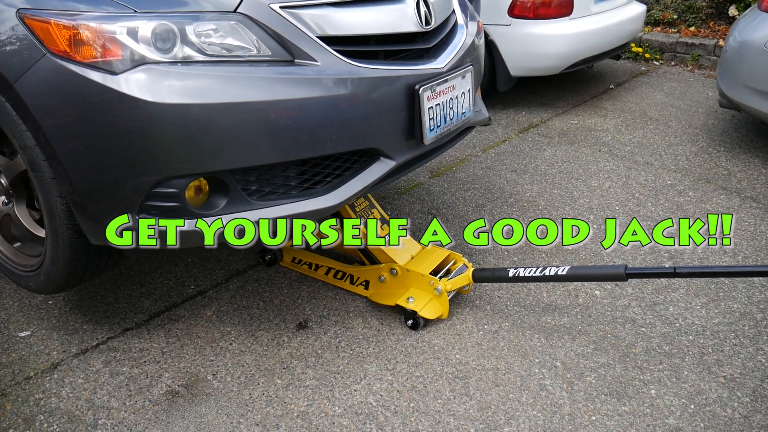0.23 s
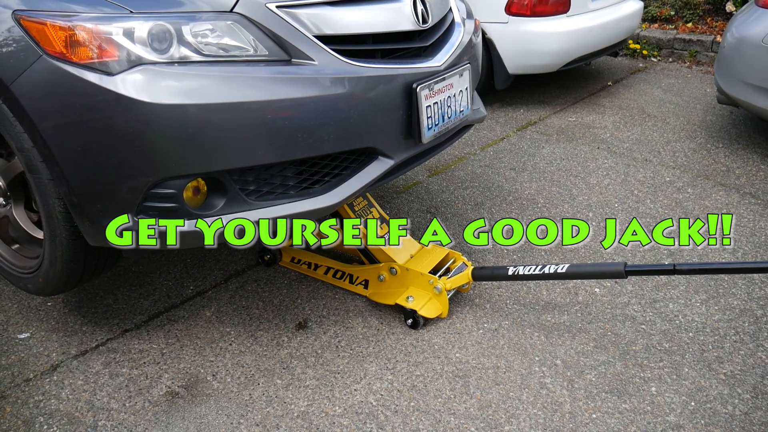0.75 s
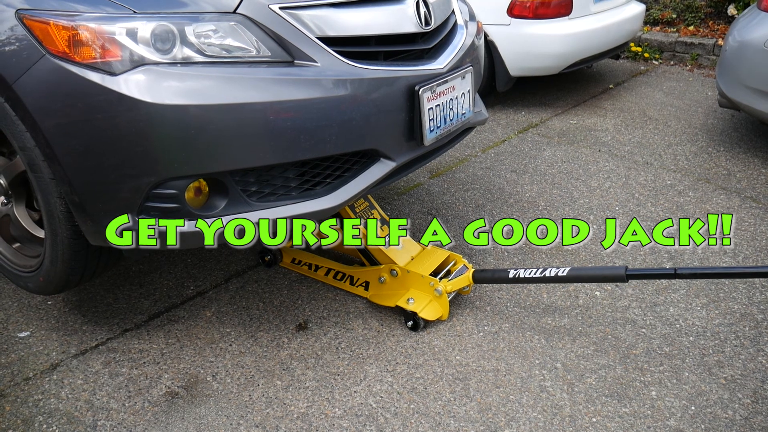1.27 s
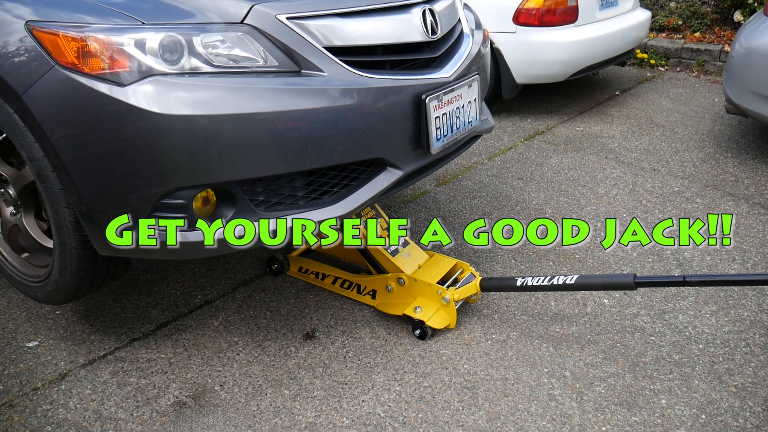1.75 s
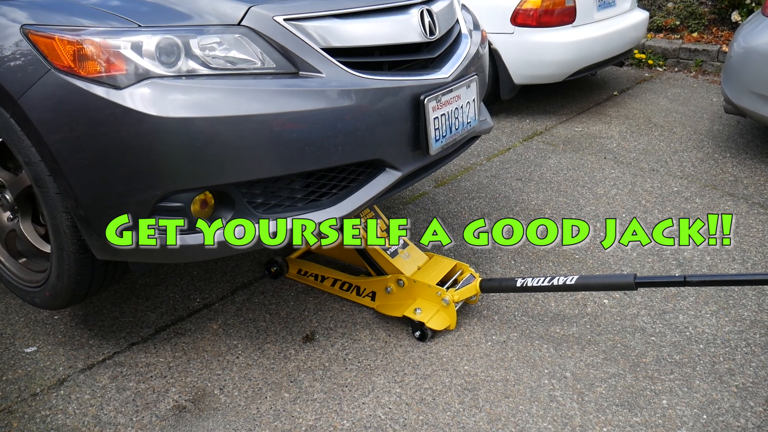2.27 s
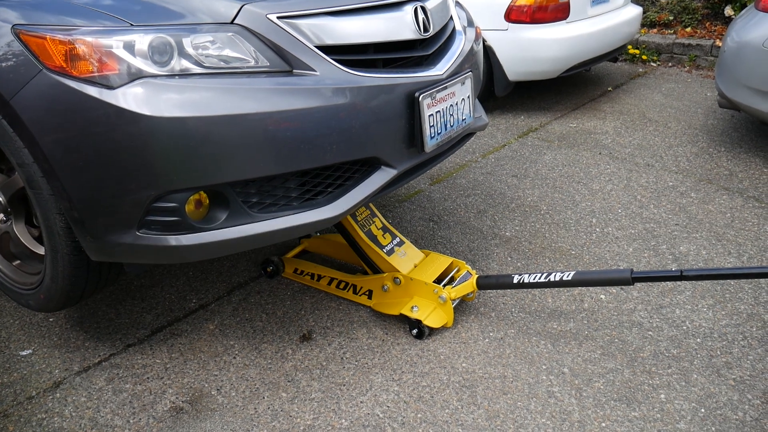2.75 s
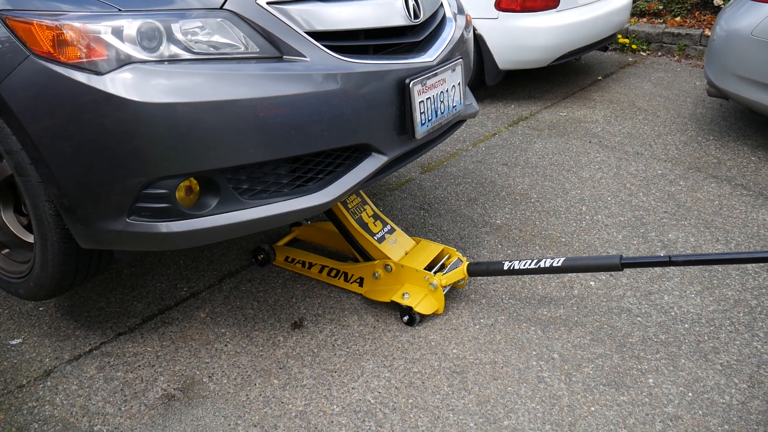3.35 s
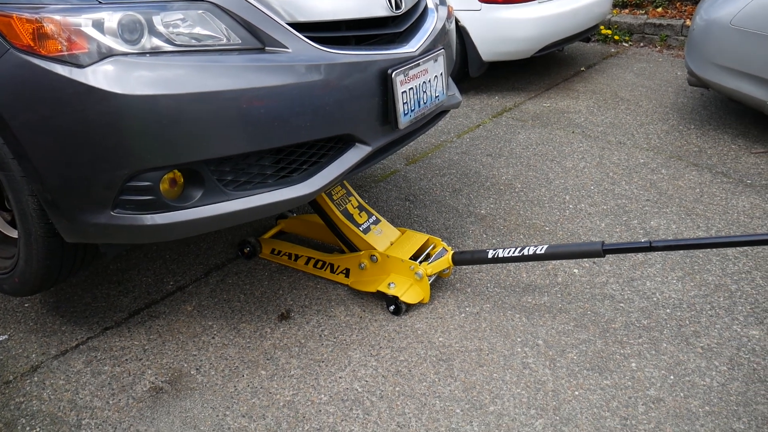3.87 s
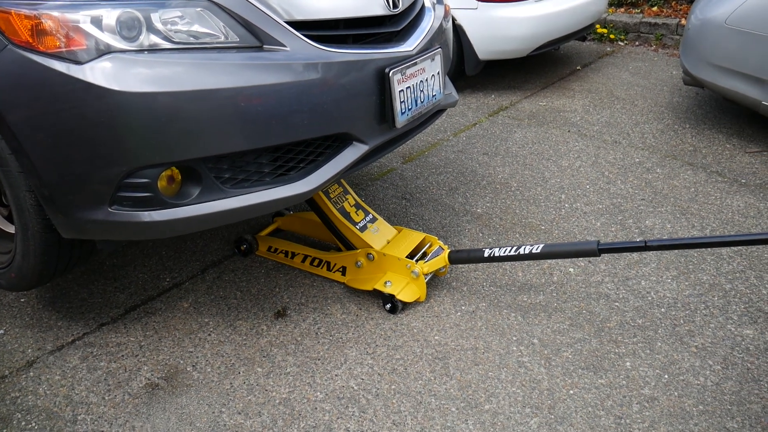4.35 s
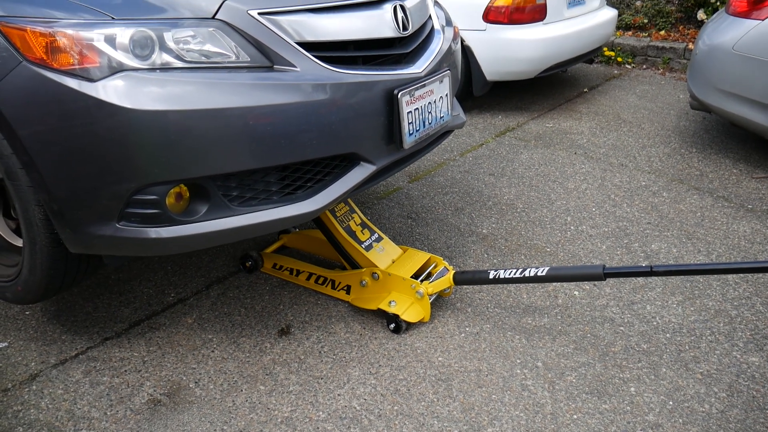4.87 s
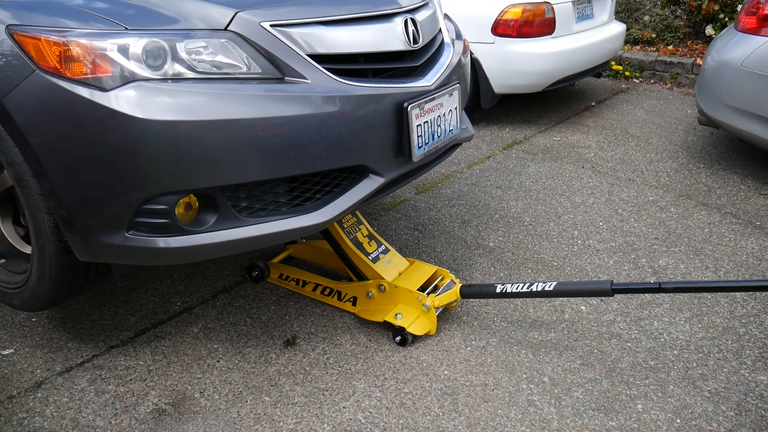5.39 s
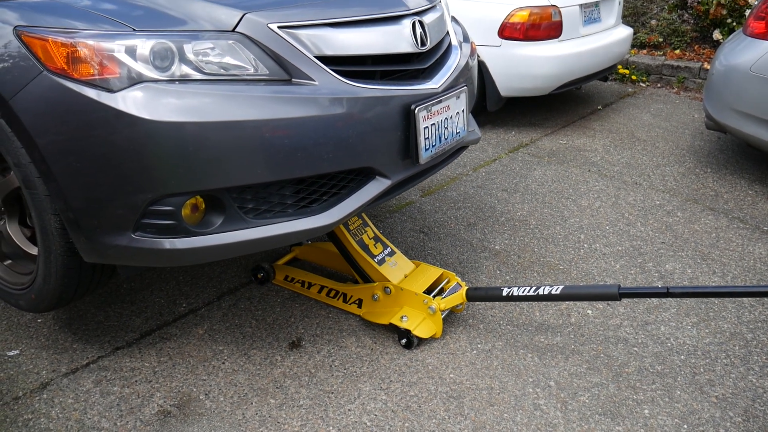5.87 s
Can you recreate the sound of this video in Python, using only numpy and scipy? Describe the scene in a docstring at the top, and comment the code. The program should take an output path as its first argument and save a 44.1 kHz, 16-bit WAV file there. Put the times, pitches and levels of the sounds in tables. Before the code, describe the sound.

Low wind buffets the microphone at first and grit crunches lightly. Then a floor jack's loose steel handle starts knocking: a run of sharp, uneven clinks and rattles with a short bright ring, mixed early on with gritty crunches. The heavy frame lands once with a dull clunk toward the end. Behind it are the sounds of an outdoor car park: far traffic, a low hum and a barely audible bird trill.

```python
"""A steel floor jack is pumped under a car in an open car park. Its loose handle tube clinks in
the socket and sets tube and frame ringing, and the frame clunks once on the ground and bounces.
Short crunches, mostly grit, come in between. Far traffic rumbles in swells over a low hum, wind
shakes the microphone at first, and a small bird trills far off."""
import sys
import numpy as np
from scipy import signal
from scipy.fft import rfft, irfft
from scipy.io import wavfile

SR = 44100
rng = np.random.default_rng(int(sys.argv[2]) if len(sys.argv) > 2 else 0)


def pcm_store(signal):
    """Save signal as 16-bit PCM."""
    levels = np.round(np.clip(np.atleast_2d(signal), -1, 1) * 32767)
    wavfile.write(sys.argv[1], SR, levels.astype(np.int16).T)


N = 270377

# Handle knocks: start_s, level_db, clatter_length_factor, rise_s, body_db, bright_db, edge_db,
# tube_low_db, arm_db, tube_high_db, saddle_db
KNOCKS = [(1.1618, -46, 4, 0.0035, -10, 14, -3, -11, -18, -11, -33),
          (1.2135, -12, 3.4, 0.022, 5, -20, -43, -17, 0.5, -25, -31),
          (1.2411, -16.5, 0.27, .006, 11, -27, -36, -22, 0, -27, -26),
          (1.3335, -11, 1.22, .0052, -2, -38, -49, -30, -8.5, -43, -35),
          (1.575, -16.5, 1.6, 0.0068, 3, -5, -31, -40, -25, -28, -9),
          (1.8496, -30.5, 2.2, 0.0029, -4, -11, -16, -19, -14, -29, -10.5),
          (1.9367, -42, 1.1, 0.0027, 6, 9, -28, -7, 4, -13, -8.5),
          (2.339, -21, 2.8, 0.0069, 11, -7, -44, -2.5, 3, -15, -13),
          (2.388, -11.5, 1.08, 0.0028, 1, 12.5, 1, -19.5, -21, -28, -46.5),
          (2.779, -24, 6.4, 0.0027, 3, -46, -37, -14, -1, -27, -51),
          (2.848, -20.5, 3, 0.0027, -8, -31, -44, -12, 1.5, -7, -12),
          (2.887, -8.5, 1.2, .003, -4.5, 2, -10, -28, -13.5, -36, -22),
          (3.3343, -33.5, 2.9, 0.0022, -1, -1, -16, -5, -15, -11, -12),
          (3.37, -6.5, 1.14, 0.0025, -9, -4.5, -13.5, -16.5, -30, -21.5, -40),
          (3.759, -37, 1.4, 0.0086, -1, -8, -37, -4, -0.5, -9, -18.5),
          (3.8302, -49, .81, .003, -2, -17, -25, 2, 6.5, -21.5, -24),
          (4.0238, -6, 1.23, .0029, -10.5, -10.5, -14, -18, -27, -20.5, -30),
          (4.7842, -8.5, 1.42, .0029, -1, -3.5, -10, -22.5, -24, -16.5, -19),
          (5.001, -31.5, 2.1, 0.0087, 0, -31, -48, -2, -2, -36, -33),
          (5.139, -13.5, 1.05, 0.0021, 6.5, 3, -41, -8, -12.5, -41, -26),
          (5.729, -16.5, 0.79, .0029, 10, -4.5, -34, -4, -15.5, -31, -22),
          (5.812, -25.5, 1.6, 0.0028, 9.5, -16, -34, 2, -6, -35, -17)]
# The steel's ringing tones, one row for each family that sounds together: pitch_hz
TONE_PITCHES = [
    [1072],
    [1240, 1560],
    [1363],
    [2036],
    [2331],
    [2430, 2460, 2574, 2773, 3150, 3219, 3325],
    [2935, 2995],
    [3733],
    [3564, 3908, 3990, 4231],
    [4662, 4960, 5130, 5192, 5303, 5348, 5464, 5682],
    [6258, 6961, 7173, 7284, 7820, 8100, 8515, 8930, 9470, 9810, 10310, 11240, 11680],
]
# For each of those tones: level_db, fade_s (a fade is the time to drop 60 dB)
TONE_RINGS = [
    [(1, 0.44)],
    [(-1, 0.129), (9, 0.019)],
    [(11.5, 0.29)],
    [(-1, 0.19)],
    [(-1, 0.44)],
    [(-12.5, 0.15), (-10.5, 0.17), (-12, 0.1), (-10, 0.11), (-16.5, 0.14), (-11, 0.12), (-13.5, 0.14)],
    [(3, 0.23), (-13.5, 0.33)],
    [(-3, 0.35)],
    [(3, 0.13), (5, .18), (-21.5, 0.11), (3, 0.037)],
    [(-8, 0.067), (-3, 0.11), (-2.5, 0.22), (-9, 0.36), (3, 0.15), (-4.5, 0.26), (1, 0.13), (-3, 0.13)],
    [(-29, 0.033), (-43, 0.17), (-21.5, 0.25), (-43, 0.21), (-12, 0.15), (-33.5, 0.33), (-30, .18),
     (-31, 0.14), (-33, 0.17), (-38, 0.11), (-23, 0.22), (-33.5, .12), (-28.5, 0.18)],
]
# The column of KNOCKS that each family follows: column_number
FAMILY_COLUMNS = [7, 8, 8, 8, 9, 5, 10, 9, 5, 6, 5]
# How strongly each family follows it: share, offset_db
FAMILY_DRIVES = [(0.94, -2), (1.8, -6.5), (0.73, -14.5), (0.45, -6.5), (0.93, -1), (0.1, -1), (0.96, 0.5),
                 (0.52, -9.5), (0.33, -20), (0.42, -12.5), (1, -20)]

def jack_ringing(start_spread=1.6, build_cycles=43):
    """Each knock sets the steel tones ringing; they start slightly apart, build up and die away."""
    knocks, out = np.array(KNOCKS), np.zeros(N)
    start_s, knock_db, _, rise_s = knocks.T[:4]
    families = zip(TONE_PITCHES, TONE_RINGS, FAMILY_COLUMNS, FAMILY_DRIVES)
    tones = []
    for pitches, rings, column, (share, offset_db) in families:
        drive_db = knock_db + offset_db + share * knocks[:, column]
        tones += [(hz, db + drive_db, fade_s) for hz, (db, fade_s) in zip(pitches, rings)]
    chance_db = rng.normal(0, 2, (len(knocks), len(tones)))
    late_s = start_spread * rise_s[:, None] * rng.random(chance_db.shape)
    for i, (hz, level_db, fade_s) in enumerate(tones):
        taps = np.zeros(N)
        taps[((start_s + late_s[:, i]) * SR).astype(int)] = gain(level_db + chance_db[:, i])
        build_s = build_cycles / hz
        scale = 2 * (1 - gain(-60 / (build_s * SR)))   # keeps the build-up from adding level
        out += ring(scale * ring(taps, hz, build_s), hz, fade_s)
    return out

# Where a knock's tone colour is set, from low to high: pitch_hz
COLOUR_PITCHES = [500, 1200, 2600, 5600, 6600, 10000, 15000]

def knock_colour(knock, hz):
    """A knock's level in dB at one pitch: thinner in the bass, near 6.6 kHz and at the very top."""
    body_db, bright_db, edge_db = knock[4:7]
    curve_db = [body_db - 16, body_db, 0, bright_db, edge_db - 8.5, edge_db, 1.7 * edge_db - 8]
    return knock[1] + np.interp(np.log(hz), np.log(COLOUR_PITCHES), curve_db)

# Clatter length before each knock stretches it: pitch_hz, fade_s
CLATTER_FADES = [(400, 0.31), (1300, 0.12), (3500, 0.17), (9000, 0.11)]

def jack_clatter(level_db=-15, tone_count=200):
    """Many close steel tones blur into noise that builds up and dies band by band."""
    t, out = np.arange(SR // 2) / SR, np.zeros(N)
    all_hz = np.fft.rfftfreq(N, 1 / SR)
    peaks = np.full(len(all_hz), .16)
    for hz, height in zip(rng.uniform(2400, 15500, tone_count), rng.uniform(.3, 1.7, tone_count)):
        near = slice(int((hz - 200) * N / SR), int((hz + 200) * N / SR))
        peaks[near] += height / (1 + ((all_hz[near] - hz) / 11) ** 2)
    steel = irfft(rfft(rng.standard_normal((2, N))) * peaks, N)
    for i, low_hz in enumerate(280 * 2 ** np.arange(0, 6, 1 / 3)):
        hz, loudness = low_hz * 2 ** (1 / 6), np.zeros(N)
        for knock in KNOCKS:
            rise_s = knock[3] * (COLOUR_PITCHES[2] / hz) ** .2   # low bands rise more slowly
            fade_s = min(knock[2], 2.6) * at_pitch(CLATTER_FADES, hz)
            shape = rise_and_fade(t, rise_s, fade_s)
            add(loudness, knock[0], shape * gain(knock_colour(knock, hz) + level_db))
        out += loudness * band(steel[i % 2], [low_hz, low_hz * 2 ** (1 / 3)], order=2)
    return out

# The frame's landing and its bounce: start_s, level_db
CLUNKS = [(4.79, -12), (4.838, -21.5)]
# The frame's low tones: pitch_hz, level_db, fade_s
FRAME_TONES = [(296, -3, .1), (419, -1, 0.093), (513, 4, 0.059), (601, 1.5, 0.055), (750, -10, 0.059)]

def frame_clunk(rise_s=.005):
    """The heavy frame hits the ground and its low tones die quickly."""
    t, out = np.arange(SR // 2) / SR, np.zeros(N)
    for start_s, hit_db in CLUNKS:
        for hz, tone_db, fade_s in FRAME_TONES:
            tone = np.sin(2 * np.pi * (hz * t + rng.random()))
            add(out, start_s, gain(hit_db + tone_db) * rise_and_fade(t, rise_s, fade_s) * tone)
    return out

# Short crunches: start_s, level_db, pitch_hz, width_octaves, fade_s
# At 5.112 s is a short, faint rasp just before a knock; the rest are grit that shoes and wheels crush.
CRUNCHES = [(0.333, -37.5, 3200, 1.5, .22), (0.404, -38.5, 4940, 1.7, 0.16), (.437, -27.5, 1200, 1.5, 0.13),
            (0.463, -38.5, 2880, 1.9, 0.15), (0.521, -37, 2800, 1, .09), (0.758, -43, 6330, 1.7, .17),
            (0.786, -28, 2550, 1.8, 0.14), (1.42, -32, 3670, 1.25, 0.1), (1.496, -32, 3530, 1.9, 0.28),
            (1.524, -31, 2420, 0.6, 0.1), (1.542, -30.5, 4200, 2.25, .3), (1.547, -18, 2390, 1.7, 0.19),
            (1.639, -38.5, 7960, 1.5, 0.4), (1.676, -8, 2510, 0.69, 0.081),
            (1.702, -22.5, 2500, 1.45, 0.081), (1.721, -23.5, 2680, 0.64, 0.11),
            (1.742, -34.5, 2800, 1.9, 0.21), (1.768, -26, 2740, 0.41, 0.13),
            (1.896, -24.5, 2740, .68, 0.051), (1.963, -40, 5000, 1.4, .14),
            (1.974, -12.5, 2140, 0.99, .079), (2.0, -30, 2650, 0.75, 0.07), (2.522, -31, 3430, 0.78, 0.07),
            (2.597, -33, 3120, 1.23, 0.1), (5.112, -30, 2360, 1.2, 0.16), (5.635, -53, 6500, 1.5, 0.11)]

def crunches(level_db=-9, clicks_per_s=7000):
    """Dense clicks around one pitch make each short, rough burst."""
    t, out = np.arange(SR // 3) / SR, np.zeros(N)
    size = (len(CRUNCHES), len(t))
    clusters = rng.standard_normal(size) * (rng.random(size) < clicks_per_s / SR)
    for clicks, (start_s, db, hz, octaves, fade_s) in zip(clusters, CRUNCHES):
        crunch = band(clicks, [hz / 2 ** (octaves / 2), hz * 2 ** (octaves / 2)], order=3)
        rise_s = .0016 + .16 * fade_s ** 2   # longer crunches start more softly
        add(out, start_s, crunch * rise_and_fade(t, rise_s, fade_s) * gain(db + level_db))
    return out

# How the traffic comes and goes: time_s, rumble_db, swell_db
TRAFFIC_LEVELS = [(0.02, -38, -39), (0.3, -36.5, -36.5), (0.62, -36, -27), (0.85, -33, -35),
                  (1.11, -34.5, -35), (1.4, -31.5, -24), (1.65, -35, -38.5), (1.97, -34.5, -23.5),
                  (2.1, -36, -27), (2.47, -36, -36.5), (2.62, -37, -24.5), (2.88, -31.5, -33),
                  (3.02, -35.5, -29), (3.32, -41, -38.5), (3.81, -38.5, -33.5), (4.2, -50.5, -44),
                  (4.8, -37.5, -34), (5.301, -32, -40), (5.47, -36.5, -33), (6.13, -34.5, -38)]
# Tone colours of the rumble, swell, tyre hiss and far hiss: pitch_hz, level_db
RUMBLE_COLOUR = [(70, -4.5), (100, 5.5), (140, 12), (180, 7), (220, 1), (300, -47)]
SWELL_COLOUR = [(160, -16), (210, -6), (265, 0), (310, -3), (370, -8), (430, -9), (520, -22)]
TYRE_COLOUR = [(250, 2.5), (330, -2), (400, 5), (500, -2), (630, -6), (1000, -12), (1300, -18.5),
               (1600, -23), (2000, -81), (3000, -36)]
FAR_COLOUR = [(1000, 4.5), (1600, -1.5), (2500, -3.5), (4000, -14.5), (5500, -11), (6500, -22.5),
              (8000, -22.5), (15000, -22)]

def traffic(far_db=-54.5):
    """Far cars rumble and swell; their tyre hiss follows and slowly fades over an even, far hiss."""
    t, out = np.arange(N) / SR, np.zeros(N)
    time_s, *levels = np.transpose(TRAFFIC_LEVELS)
    rumble_db, swell_db = [np.interp(t, time_s, db) for db in levels]
    tyre_db = -23 + .28 * swell_db - .82 * t
    for colour, db, waver_db in [(RUMBLE_COLOUR, rumble_db, 1.5), (SWELL_COLOUR, swell_db, 1.5),
                                 (TYRE_COLOUR, tyre_db, 1.6), (FAR_COLOUR, far_db, .6)]:
        noise = normalise(coloured(rng.standard_normal(N), colour, 12.6))
        out += noise * gain(db + waver_db * wander(2.9))
    return out

# The wind's deep tone colour: pitch_hz, level_db
WIND_COLOUR = [(8, -5), (22, 20.5), (32, -19), (46, -2.5), (80, -15), (200, -95)]

def wind(gust_db=-27, gust_end_s=.52, fall_db_per_s=24.5, breeze_db=-45):
    """An opening gust dies down to an uneven breeze."""
    after_s = np.maximum(np.arange(N) / SR - gust_end_s, 0)
    level_db = np.maximum(gust_db - fall_db_per_s * after_s, breeze_db)
    noise = normalise(coloured(rng.standard_normal(N), WIND_COLOUR, 12))
    return noise * gain(level_db + 3 * wander(3.86))

def hum(pitch_hz=59.8, level_db=-41):
    """A low tone wavers as noise at the same pitch mixes with it."""
    tone = np.sqrt(2) * np.sin(2 * np.pi * pitch_hz * np.arange(N) / SR)
    return gain(level_db) * (.95 * tone + .84 * pitched_noise(pitch_hz, width_hz=8.96))

# The trill's loudness: time_s, level_db
TRILL_LEVELS = [(2.4, -62), (2.75, -61), (3.72, -67)]
# The trill's pace: time_s, running_note_count
TRILL_PACE = [(2.4, -7.0), (3.272, 11.0), (3.73, 20.0)]

def bird(top_hz=5880, fall_hz=560, note_share=.4):
    """A small bird sings a fast run of short falling notes."""
    t = np.arange(N) / SR
    progress = np.interp(t, *np.transpose(TRILL_PACE)) % 1 / note_share   # 0 to 1 in each note
    notes = np.sin(np.pi * np.clip(progress, 0, 1))
    level_db = np.interp(t, *np.transpose(TRILL_LEVELS), left=-200, right=-200)
    flutter_db = 2 * wander(9.6) + 4 * wander(90)
    whistle = np.sin(2 * np.pi * np.cumsum(top_hz - fall_hz * progress) / SR)
    return gain(level_db + flutter_db) * notes * whistle

# Thin, high bands of noise: pitch_hz, width_hz, level_db
WHINES = [(3690, 270, -71), (10020, 210, -80.5), (12050, 56.2, -88)]

def whine():
    """A faint, steady whine sits behind everything."""
    return sum(gain(db) * pitched_noise(hz, width_hz) for hz, width_hz, db in WHINES)

def gain(db):
    """Turn decibels into a multiplier."""
    return 10 ** (np.asarray(db) / 20)

def normalise(x):
    """Scale to an average strength (rms) of 1."""
    return x / np.sqrt(np.mean(x ** 2) + 1e-20)

def rise_and_fade(t, rise_s, fade_s):
    """The loudness of a hit over time."""
    return (1 - np.exp(-t / rise_s)) * gain(-60 * t / fade_s)

def band(x, edges_hz, order):
    """Keep the sound between two pitches, at strength 1."""
    return normalise(signal.sosfilt(signal.butter(order, edges_hz, "band", fs=SR, output="sos"), x))

def at_pitch(table, hz):
    """Read between the rows of a (pitch_hz, value) table."""
    pitches, values = np.transpose(table)
    return np.interp(np.log(hz), np.log(pitches), values)

def coloured(x, colour, fall_db_per_octave=0):
    """Apply a tone colour; above its last pitch the level can fall away."""
    hz = np.maximum(np.fft.rfftfreq(len(x), 1 / SR), 1)
    octaves_above = np.maximum(np.log2(hz / colour[-1][0]), 0)
    return irfft(rfft(x) * gain(at_pitch(colour, hz) - fall_db_per_octave * octaves_above), len(x))

def wander(rate_hz):
    """A smooth random wobble of typical size 1."""
    r = np.exp(-80 * np.pi * rate_hz / SR)
    slow = signal.lfilter([1], [1, -2 * r, r * r], rng.standard_normal(N // 40 + 2002))[2000:]
    return np.interp(np.arange(N) / 40, np.arange(len(slow)), normalise(slow))

def ring(x, hz, fade_s):
    """Each click in x starts a fading tone of the same height."""
    r, step = gain(-60 / (fade_s * SR)), 2 * np.pi * hz / SR
    return signal.lfilter([0, np.sin(step)], [1, -2 * r * np.cos(step), r * r], x + 1e-18)

def pitched_noise(hz, width_hz):
    """Noise narrowed around one pitch, at strength 1."""
    fade_s = np.log(1000) / (np.pi * width_hz)
    once = ring(rng.standard_normal(N + SR), hz, fade_s)
    return normalise(ring(once, hz, fade_s)[SR:])

def add(out, start_s, piece):
    """Mix a piece in at its start time."""
    i = round(start_s * SR)
    out[i:i + len(piece)] += piece[:N - i]

# Level of the left-right spread against the centre: pitch_hz, level_db
STEREO_SPREAD = [(30, -44), (200, -58), (600, -43), (2500, -25.5), (5000, -20), (9000, -11), (14000, -9)]

def scene():
    """Both ears hear almost the same mix, with a faint flicker between left and right."""
    centre = jack_ringing() + jack_clatter() + frame_clunk() + crunches()
    centre += wind() + traffic() + hum() + whine() + bird()
    side = coloured(centre, STEREO_SPREAD) * wander(70)
    return np.array([centre + side, centre - side])

def record(dry, cutoff_hz=15700):
    """Cut away the highest treble."""
    return signal.sosfilt(signal.ellip(12, .3, 70, cutoff_hz, fs=SR, output="sos"), dry)

dry = scene()
out = record(dry)
pcm_store(out)
```